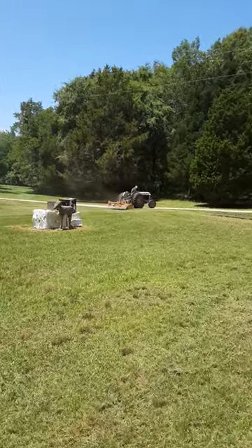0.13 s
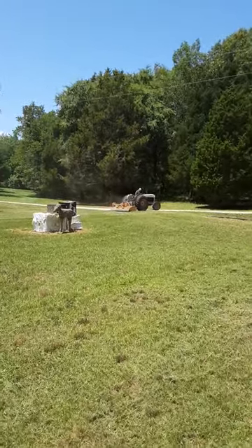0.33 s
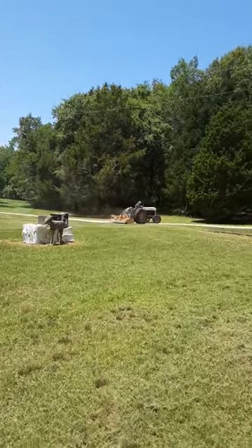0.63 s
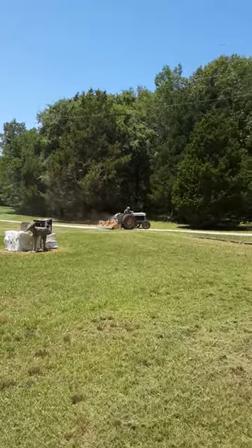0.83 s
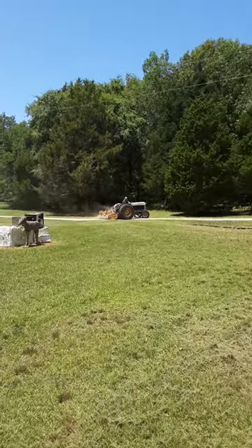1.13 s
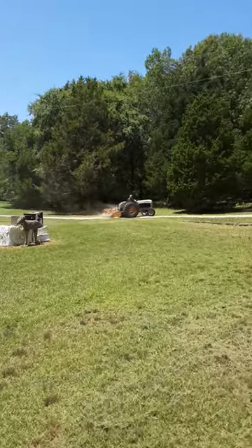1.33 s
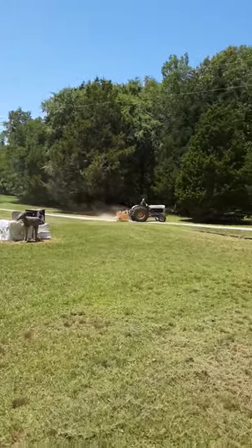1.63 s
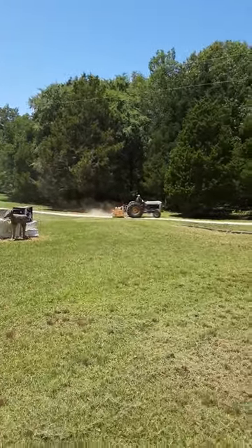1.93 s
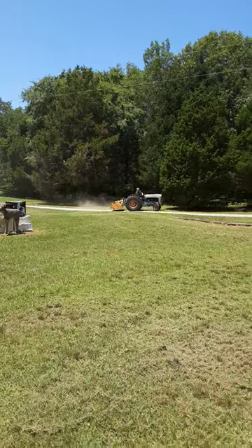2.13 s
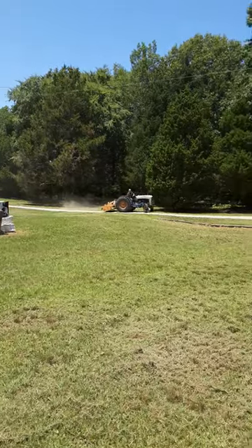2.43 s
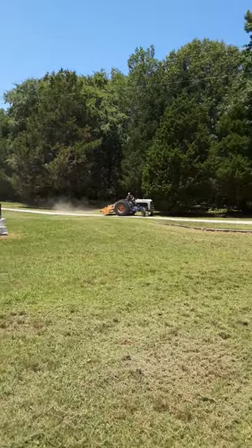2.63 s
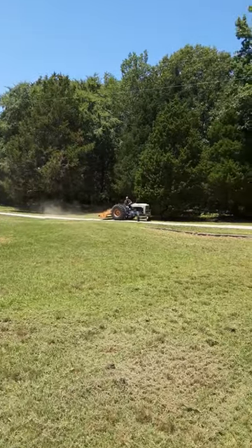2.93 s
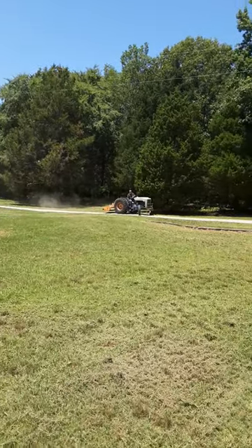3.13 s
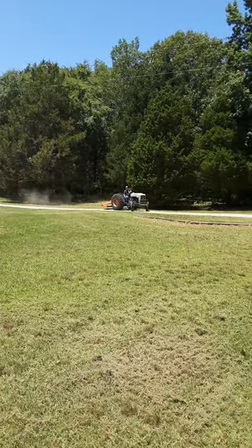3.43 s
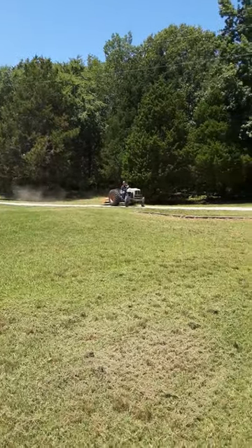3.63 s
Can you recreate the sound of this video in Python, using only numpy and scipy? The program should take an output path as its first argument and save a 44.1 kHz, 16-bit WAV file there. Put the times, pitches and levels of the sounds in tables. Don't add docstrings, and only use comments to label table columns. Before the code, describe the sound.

A tractor drones throughout at a distance, a low boom around 100 Hz over throbbing rumble, dipping slightly in pitch mid-way and rising at the end. Mower flails hiss unevenly through grass. From 0.5 to 1.0 s gravel bursts in bright, crunchy spits, strongest near 0.54 and 0.64. Light stone ticks scatter throughout; faint thin squeaks come near 1.3, 2.3 and 3.2-3.4 s. Open yard, faint tree echo, phone limiting peaks.

```python
import sys
import numpy as np
from scipy import signal
from scipy.fft import rfft, irfft, next_fast_len
from scipy.io import wavfile
from scipy.ndimage import uniform_filter1d

SR = 44100
rng = np.random.default_rng(int(sys.argv[2]) if len(sys.argv) > 2 else 0)


def voltage_ratio(level):
    return 10 ** (np.asarray(level, float) / 20)


def unload_audio(sound):
    columns = np.transpose(np.atleast_2d(sound))
    steps = np.round(np.clip(columns, -1, 1) * 32767)
    wavfile.write(sys.argv[1], SR, steps.astype(np.int16))


N = 166257


def evened(x):
    return x / np.sqrt(np.mean(x ** 2) + 1e-20)


def read(points, hz):
    f, value = np.transpose(points)
    return np.interp(np.log(hz + 1), np.log(f + 1), value)


def control(column):
    # time in seconds, boom pitch in Hz, boom level in dB,
    # exhaust turned towards us in dB, flail load in dB.
    drive = [(0, 106.4, -22.5, 0.5, 3.5), (.3, 106.9, -20, -1.5, 4), (.5, 104.7, -23.5, 1, 3),
             (.66, 103.4, -21, -13.5, 8), (.88, 101.3, -24, -6.5, 2), (1.1, 100.6, -22.5, -8, 1.5),
             (1.4, 99.16, -20, -13.5, 2), (1.801, 98.83, -22, -4, 1.5), (2.1, 101.2, -22.5, -1, 2),
             (2.35, 101.3, -23.5, 1, 2.5), (2.7, 101.4, -27, 0.5, 3.5), (3, 101.4, -25.5, 3.5, 4.5),
             (3.299, 104, -21.5, 4.5, 5), (3.55, 105.3, -23.5, 3.5, 5), (3.77, 107.4, -28, 4.5, 6.5)]
    rows = np.array(drive)
    return np.interp(np.arange(N) / SR, rows[:, 0], rows[:, column])


def colour(x, points):
    size = next_fast_len(len(x) + 2048)
    gain = voltage_ratio(read(points, np.fft.rfftfreq(size, 1 / SR)))
    return irfft(rfft(x, size) * gain, size)[:len(x)]


def drift(top_hz):
    size = next_fast_len(N)
    lowpass = 1 / (1 + (np.fft.rfftfreq(size, 1 / SR) / top_hz) ** 4)
    x = irfft(rfft(rng.standard_normal(size)) * lowpass, size)[:N]
    return evened(x - x.mean())


def resonate(x, hz, width):
    turn = np.exp(2j * np.pi * np.cumsum(hz * np.ones(len(x))) / SR)
    r = np.exp(-np.pi * width / SR)
    return 2 * (turn * signal.lfilter([1 - r], [1, -r], x / turn)).real


def add(mix, s, sound):
    part = mix[round(s * SR):][:len(sound)]
    part += sound[:len(part)]


def burst(rise, hold, t60):
    t = np.arange(SR // 4) / SR
    release = voltage_ratio(-60 * np.maximum(t - hold, 0) / max(t60, .01))
    return np.minimum(t / rise, 1) * release


def tree_line_echo(stones):
    t60_s, level_db = 0.3, -19
    t = np.arange(SR // 2) / SR
    tail = rng.standard_normal(len(t)) * voltage_ratio(-60 * t / t60_s) * (t > .01)
    return voltage_ratio(level_db) * signal.fftconvolve(stones, tail / np.linalg.norm(tail))[:N]


def squeak():
    # start in seconds, length in seconds, first pitch in Hz, last pitch in Hz, level in dB.
    whistles = [(1.252, .045, 5200, 5200, -40), (1.326, .015, 4900, 4900, -38),
                (2.25, .035, 5300, 5250, -43), (2.25, .03, 4750, 4750, -41), (2.285, .035, 4900, 4900, -41),
                (2.96, .04, 4100, 4050, -42), (3.23, .125, 3410, 3350, -41), (3.355, .09, 3320, 3230, -43),
                (2.78, .07, 3900, 3500, -46), (1.55, .2, 2600, 2600, -50), (1.03, .035, 12700, 12700, -44)]
    fuzz_width_hz, clean_share = 18, .7
    out = np.zeros(N)
    for start, length, from_hz, to_hz, db in whistles:
        u = np.arange(round(length * SR)) / (length * SR)
        hz = from_hz + (to_hz - from_hz) * u ** 1.312
        fuzz = evened(resonate(rng.standard_normal(len(u)), hz, fuzz_width_hz))
        clean = evened(np.sin(2 * np.pi * np.cumsum(hz) / SR))
        tone = clean_share * clean + (1 - clean_share) * fuzz
        add(out, start, voltage_ratio(db) * tone * np.sin(np.pi * u ** .5) ** 0.12)
    return out


def ticks():
    # time in seconds, peak in dB, centre in Hz, width in Hz.
    strays = [(.009, -25.5, 11200, 4000), (0.083, -25, 8500, 6000), (0.158, -27, 8900, 7000),
              (.235, -24.5, 8900, 6000), (0.308, -29, 6350, 3000), (0.366, -31, 11400, 3140),
              (1.093, -39, 6000, 3000), (1.2525, -23.5, 4000, 3000), (1.2774, -21, 7460, 3600),
              (1.3252, -24.5, 5000, 3000), (1.388, -33, 7500, 2970), (1.4104, -26, 5900, 5000),
              (1.5506, -26.5, 5500, 4000), (1.9704, -24, 5470, 2500), (2.25, -30, 5000, 2500),
              (2.298, -20.5, 5806, 2500), (2.3571, -28, 7050, 2500), (2.415, -27.5, 7700, 2490),
              (2.739, -27, 7100, 3000), (2.789, -25, 3986, 4013), (2.869, -29, 2950, 2980),
              (2.954, -23.5, 5033, 6000), (3.1036, -22.5, 2893, 2530), (3.104, -22.5, 10440, 5000),
              (3.185, -31, 2970, 2950), (3.23, -25, 5950, 5030), (3.368, -25, 7950, 7040),
              (3.4931, -29.5, 2960, 2980), (3.5681, -25, 3480, 4000), (3.585, -27, 7000, 3495),
              (3.6187, -24.5, 5000, 4040), (3.717, -26, 4044, 3930)]
    rise_s, hold_s, t60_s, trim_db = .0006, 0.005, 0.06, -9
    ring_db, ring_width_hz = -12, 60
    out = np.zeros(N)
    noise = rng.standard_normal((len(strays), SR // 4))
    for (s, db, hz, width), row in zip(strays, noise):
        puff = evened(resonate(resonate(row, hz, width), hz, 2 * width))
        puff = puff * burst(rise_s, hold_s, t60_s)
        ring = resonate(puff, hz, ring_width_hz)
        add(out, s, voltage_ratio(db + trim_db) * (puff + voltage_ratio(ring_db) * ring / abs(ring).max()))
    return out


def grains():
    grains_per_s, grain_spread_db = 8000, 3
    chips_per_s, chip_cycles, chip_share = 9000, 24, .45
    size = voltage_ratio(grain_spread_db * np.minimum(rng.exponential(1, N), 5)) * rng.choice([-1., 1.], N)
    luck = rng.random(N)
    kind = rng.integers(0, 24, N)
    t = np.arange(400) / SR
    pitches = np.linspace(1800, 15500, 24) * rng.uniform(.95, 1.05, 24)
    chips = np.zeros(N)
    for k, hz in enumerate(pitches):
        hits = size * (luck < chips_per_s / SR) * (kind == k)
        ring = np.sqrt(hz) * np.sin(2 * np.pi * hz * t) * np.exp(-t * hz * np.pi / chip_cycles)
        chips += signal.oaconvolve(hits, ring)[:N]
    clicks = size * (luck > 1 - grains_per_s / SR)
    return (1 - chip_share) * evened(clicks) + chip_share * evened(chips)


def gravel():
    # time in seconds, peak in dB, ring T60 in seconds,
    # brightness in dB per octave, hold in seconds.
    spits = [(0.462, -25, 0.52, 7.5, .005), (0.479, -26, 0.15, 7, .005), (0.4972, -17, 0.058, -12, .003),
             (0.5187, -22, .05, 9, .008), (0.537, 3.5, 0.1, 1, 0.0076), (0.586, -25, 1, 10, 0.0055),
             (.6375, -19, 0.1, -5, .005), (0.6413, 2, 0.17, 1, 0.0095), (0.665, -17, 0.12, 6, .004),
             (0.68, -19, 0.066, 8.5, .004), (0.7053, -14, 0.31, 4.5, .005), (0.729, -25, 0.08, 6, .006),
             (0.7562, -5.5, 0.086, 3, 0.0076), (0.8195, -14.5, 0.14, 6, 0.0067),
             (.84, -25, 0.23, 5, 0.0093), (1.01, -24, 0.074, 2.5, .008), (1.0307, -22, 0.065, 2.5, 0.012)]
    # frequency in Hz, density in dB per Hz.
    stone_colour = [(710, -52), (1200, -38), (2000, -7.5), (2320, -9), (3250, -6), (4410, 1), (6650, -5.5),
                    (12700, -9), (16000, -18)]
    # start, top and end in seconds.
    spray_s = (.46, .72, 1.07)
    rise_s, trim_db, spray_db = 0.00079, -11, -31.5
    treble_hz, treble_t60_share = 5740, 0.66
    stones = evened(colour(grains(), stone_colour))
    body = colour(stones, [(treble_hz * .8, 0), (treble_hz * 1.5, -14)])
    treble = stones - body
    out = np.zeros(N)
    for s, db, t60, tilt_db, hold in spits:
        at = slice(round(s * SR), round(s * SR) + SR // 4)
        part = body[at] * burst(rise_s, hold, t60)
        part = part + treble[at] * burst(rise_s, hold, treble_t60_share * t60)
        tilt = [(900, -tilt_db - 20), (2000, -tilt_db), (16000, 2 * tilt_db)]
        add(out, s, voltage_ratio(db + trim_db) * colour(part, tilt))
    start, top, end = spray_s
    spray = np.interp(np.arange(N) / SR, [start, start + .03, top, end], [0, .6, 1, 0])
    return out + voltage_ratio(spray_db) * spray * stones[::-1]


def flails(turns):
    # frequency in Hz, density in dB per Hz.
    hiss_colour = [(530, -31), (900, -8.5), (1130, -6.5), (1530, -3.5), (1660, -4.5), (3770, -4),
                   (9770, -14), (12600, -14), (16000, -21.5)]
    bite_bands_hz = (1200, 3000, 6000, 11000)
    bite_weights = (0.06, 0.38, 1.23, 1.3)
    hiss_db, flap_db, patch_db = -38.5, 0.86, 0.8
    rotor_share, rotor_depth = 0.65, 0.036
    bites_per_s, bite_s, bite_depth = 70, 0.0083, 0.43
    hop = 64
    frames, hz = N // hop + 6, np.fft.rfftfreq(256, 1 / SR)
    a, b, patches = rng.standard_normal((frames, 129, 3)).T
    patches = uniform_filter1d(patches, size=14, axis=0)
    patches = evened(uniform_filter1d(patches, size=12, axis=1))
    struck = rng.random((frames, 1)) < bites_per_s * hop / SR
    hits = struck * rng.random((frames, 4)) ** 2 * bite_weights
    bites = signal.lfilter([1], [1, -np.exp(-hop / (bite_s * SR))], hits, axis=0)
    spread = np.array([np.interp(hz, bite_bands_hz, row) for row in np.eye(4)])
    z = (a + 1j * b) * voltage_ratio(patch_db * patches) * (1 + bite_depth * (bites @ spread).T)
    hiss = signal.istft(z, nperseg=256, noverlap=192)[1][:N]
    hiss = evened(colour(hiss, [(500, -54)] + hiss_colour))
    rotor = 1 + rotor_depth * np.cos(2 * np.pi * rotor_share * turns)
    flap = voltage_ratio(flap_db * drift(top_hz=44.4)) * rotor
    return hiss * flap * voltage_ratio(hiss_db + control(column=4))


def engine(turns):
    # order of half the boom pitch, level in dB over the boom reference,
    # then how far it follows the boom level, the exhaust turn and the ground echo, as shares.
    orders = [(1, -27.5, 0.33, 0.64, 0.28), (2, 1, 1, 0.39, 0.31), (3, -8.5, 0.14, 0.88, 0.0089),
              (4, -12, 0.66, 1.49, 0.15), (5, -25.5, 1, 0.042, 0.013), (6, -20.5, 0.23, 0.35, 1.18),
              (7, -26.5, 1, -0.28, 0)]
    wander_db = (.8, .4, .5, .6, 1.5, 1.5, 2)
    # time in seconds, lift in dB.
    ground_echo = [(0, -8), (.3, 2), (1.62, 3.5), (1.8, -2), (2.35, 1), (2.7, 3.5), (2.95, 4),
                   (3.249, -11.5), (3.77, -5)]
    # frequency in Hz, density in dB per Hz.
    rumble_colour = [(40, -21), (75, -8), (130, -1), (300, -0.5), (500, -15), (700, -10), (1000, -20),
                     (1500, -35)]
    boom_ref_db, phase_wander = -22, .55
    rumble_db, rumble_turn, rumble_load, rumble_throb = -32.5, 0.21, 0.22, 0.15
    boom, turn = control(column=2) - boom_ref_db, control(column=3)
    ground = np.interp(np.arange(N) / SR, *np.transpose(ground_echo))
    out = np.zeros(N)
    for k, (_, db, own, turned, echoed) in enumerate(orders, start=1):
        level_db = boom_ref_db + db + own * boom + turned * turn + echoed * ground
        level = voltage_ratio(level_db + wander_db[k - 1] * drift(top_hz=9.5))
        phase = phase_wander * np.sqrt(abs(k - 2)) * (2 + drift(top_hz=1.05))
        out += np.sqrt(2) * level * np.cos(k * 2 * np.pi * turns + phase)
    throb = 1 + rumble_throb * np.cos(2 * np.pi * turns)
    rumble = evened(colour(rng.standard_normal(N) * throb, rumble_colour))
    level_db = rumble_db + rumble_turn * turn + 0.1 * ground + rumble_load * control(column=4)
    return out + rumble * voltage_ratio(level_db + .5 * drift(top_hz=1.5))


def scatter(x):
    # frequency in Hz, coherence from 0 to 1.
    likeness = [(60, 0.99), (180, 0.76), (550, 1), (1650, 0.72), (4970, 0.52), (15000, 0.6)]
    scatter_gain = 1.15
    hz, _, z = signal.stft(np.array([x, x]), SR, nperseg=192, noverlap=144)
    same = np.where(hz < 300, 1, np.clip(read(likeness, hz), 0, 1))[:, None]
    scattered = np.sqrt(1 - same) * np.exp(2j * np.pi * rng.random(z.shape))
    z = z * (np.sqrt(same) + scatter_gain * scattered)
    return signal.istft(z, nperseg=192, noverlap=144)[1][:, :N]


def scene():
    pitch_jitter, stones_scattered, thin_scattered = .003, .9, .4
    half_boom_hz = control(column=1) / 2
    turns = np.cumsum(half_boom_hz * (1 + pitch_jitter * drift(top_hz=4.7))) / SR
    stones, thin = gravel(), ticks()
    echo = tree_line_echo(stones + thin)
    thin = thin + squeak()
    wide = engine(turns) + flails(turns) + echo
    wide = wide + stones_scattered * stones + thin_scattered * thin
    return scatter(wide) + (1 - stones_scattered) * stones + (1 - thin_scattered) * thin


def two_ports(dry):
    # frequency in Hz, gain in dB.
    mic_colour = [(3000, 0.5), (4300, 1), (6500, -2.5), (8500, 0), (10000, -3.5), (12300, 2), (15000, -1)]
    # frequency in Hz, difference in dB.
    lean = [(60, 6), (150, 3), (380, 2.5), (950, 3.5), (2380, 0), (5980, -3.5), (15000, -8.5)]
    # frequency in Hz, lead in radians.
    lead = [(3500, 0), (8000, 1.08), (12500, 1.5), (15800, 2.5)]
    edge_hz = 16000
    size = next_fast_len(N + 4096)
    hz = np.fft.rfftfreq(size, 1 / SR)
    sides = np.array([[1], [-1]])
    port = (hz < edge_hz) * voltage_ratio(read(mic_colour, hz) + read(lean, hz) / 2 * sides)
    port = port * np.exp(.5j * read(lead, hz) * sides)
    return irfft(rfft(dry, size) * port, size)[:, :N]


def limiter(x):
    limit_db, share, recover_db_per_s, sense_s = -15.5, 0.59, 296, 0.0036
    power = uniform_filter1d((x ** 2).max(0), int(sense_s * SR))
    power_db = 10 * np.log10(abs(power) + 1e-12)
    fall = np.arange(N) * recover_db_per_s / SR
    held_db = np.maximum.accumulate(power_db + fall) - fall
    over_db = np.maximum(held_db - limit_db, 0)
    return np.clip(x / voltage_ratio(share * uniform_filter1d(over_db, size=100)), -1, 1)


def low_pass(x):
    return signal.sosfilt(signal.butter(12, 16100, fs=SR, output="sos"), x)


def record(dry):
    mix = limiter(two_ports(dry))
    return low_pass(mix)


dry = scene()
out = record(dry)
unload_audio(out)
```